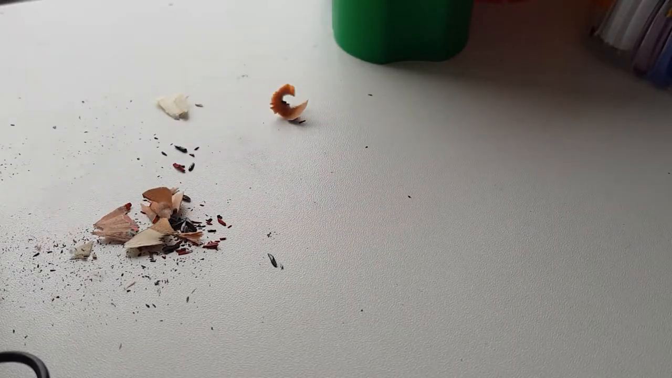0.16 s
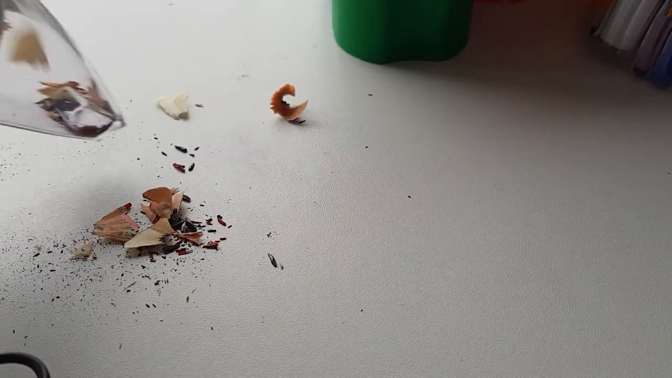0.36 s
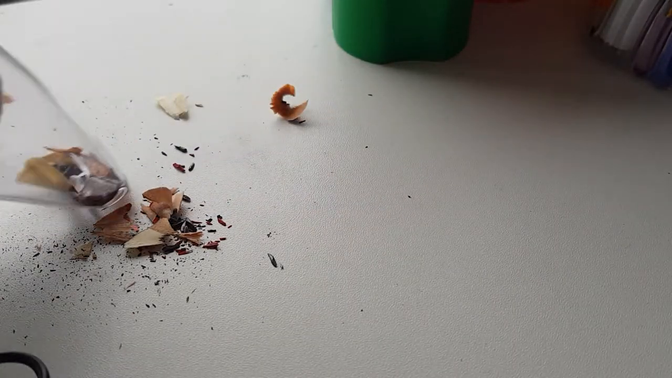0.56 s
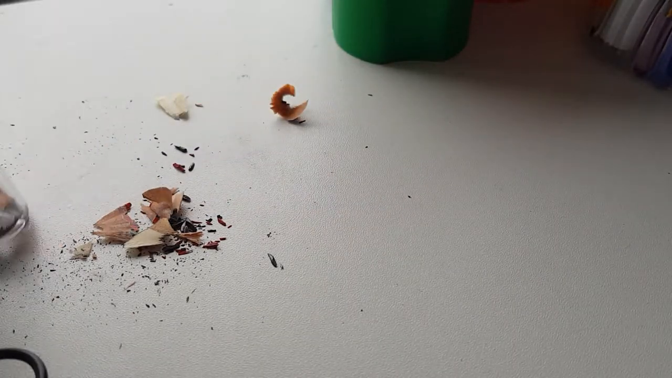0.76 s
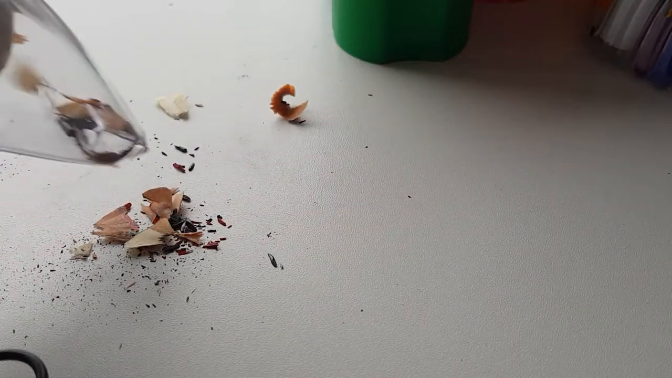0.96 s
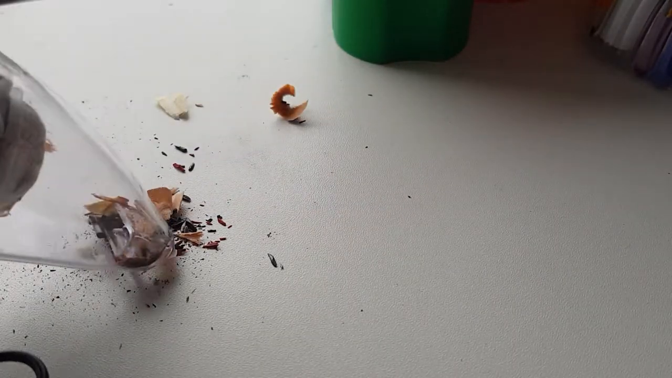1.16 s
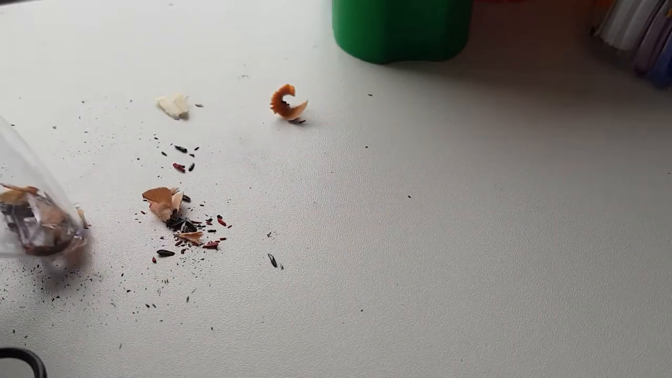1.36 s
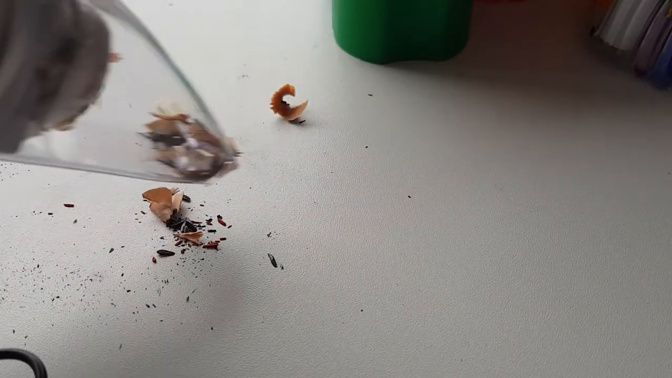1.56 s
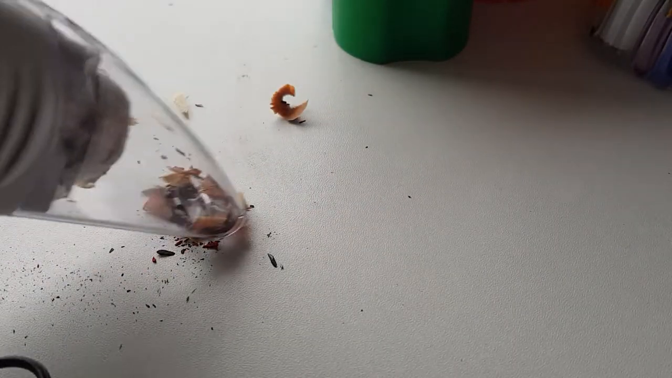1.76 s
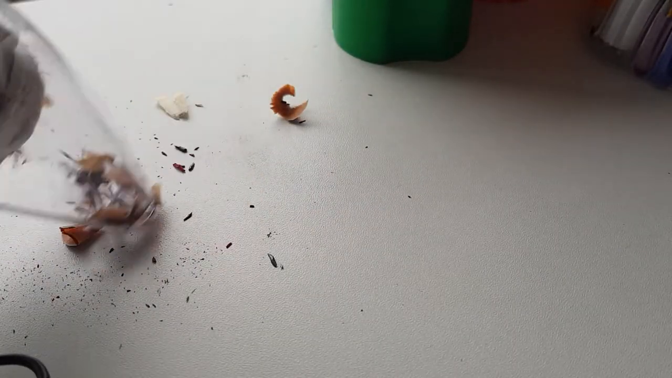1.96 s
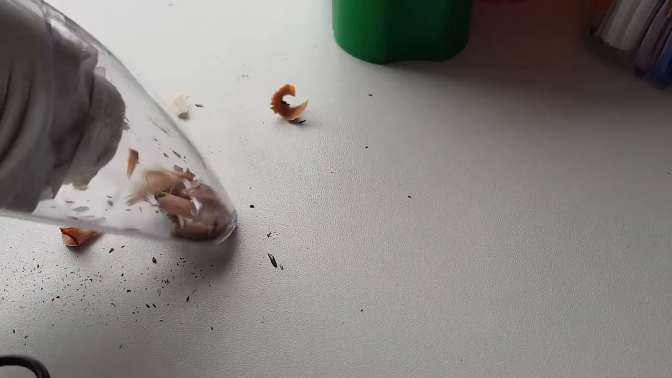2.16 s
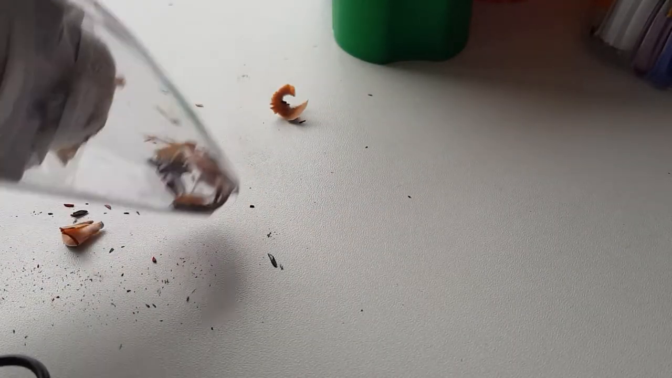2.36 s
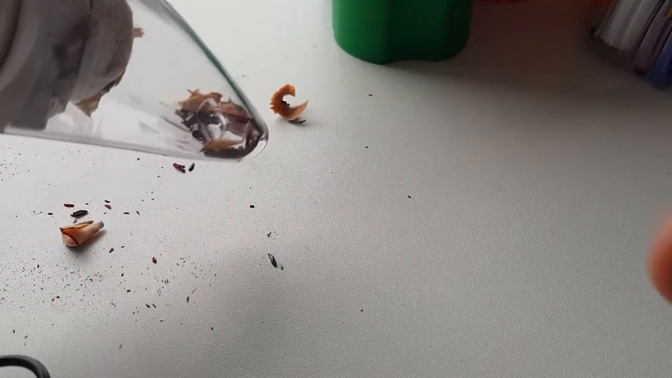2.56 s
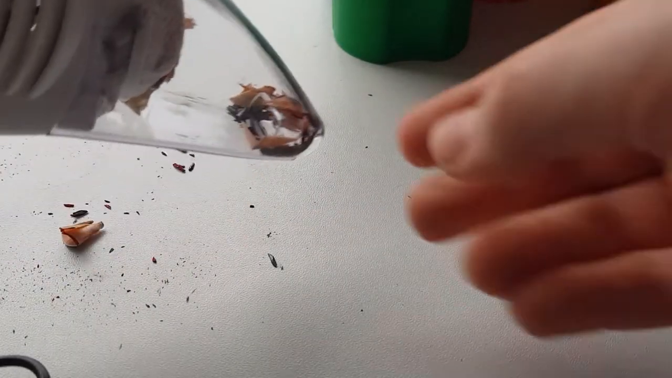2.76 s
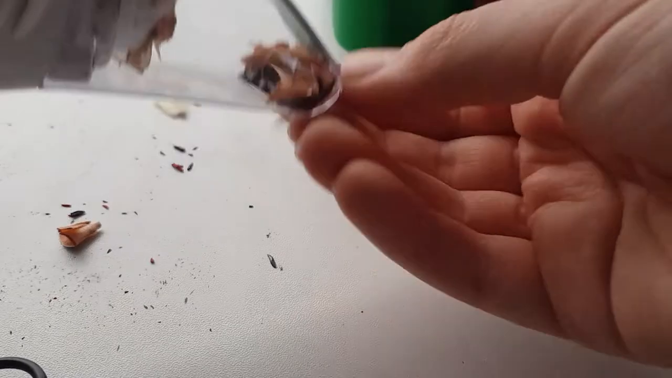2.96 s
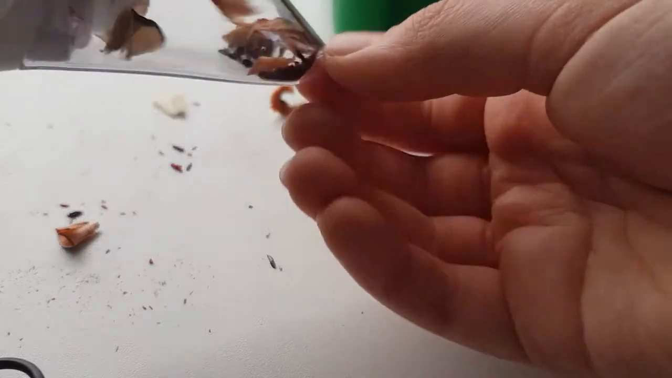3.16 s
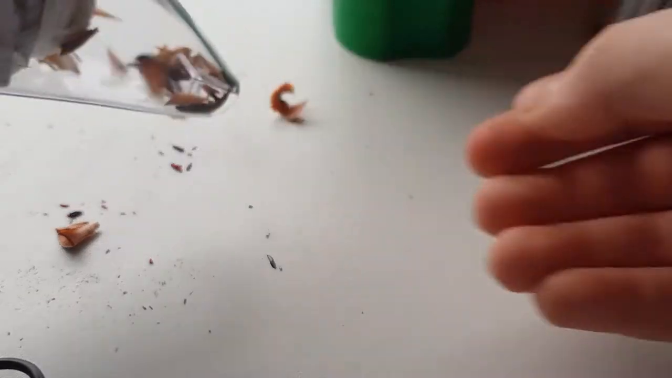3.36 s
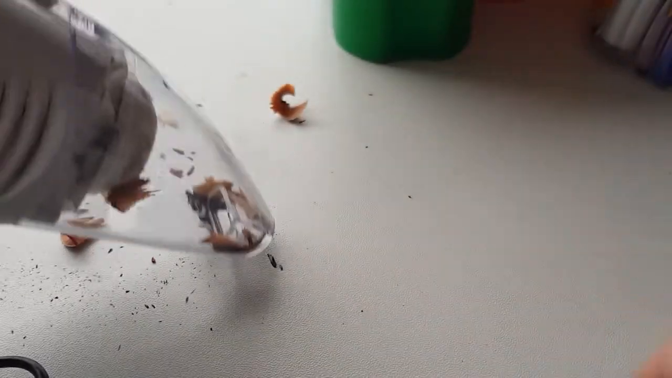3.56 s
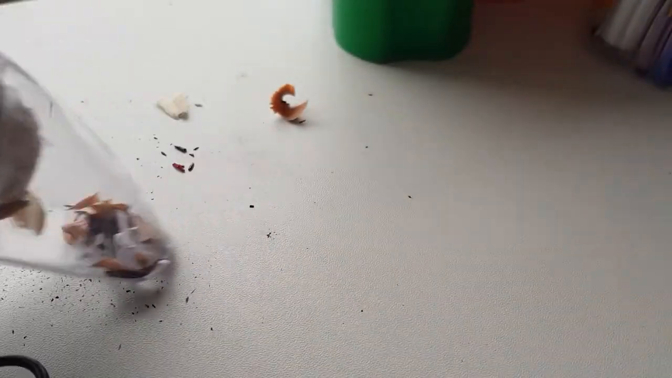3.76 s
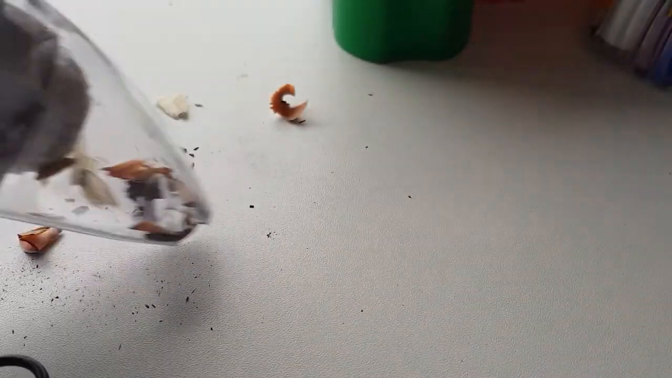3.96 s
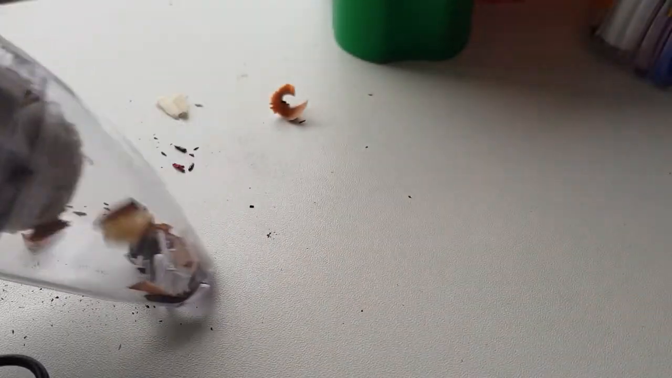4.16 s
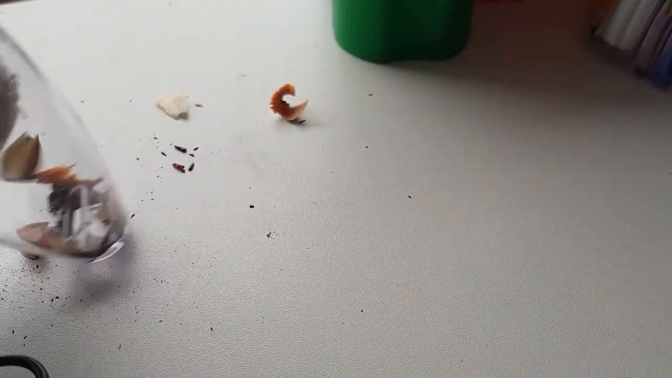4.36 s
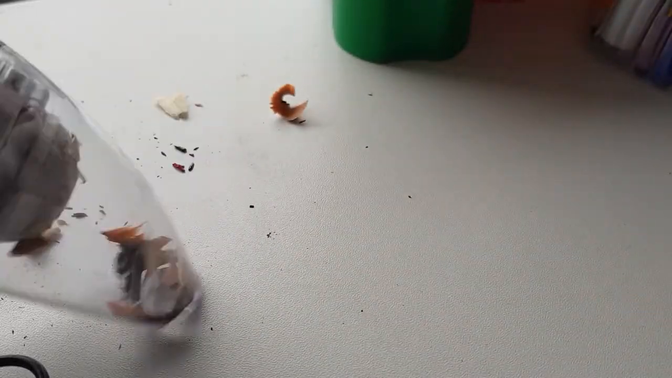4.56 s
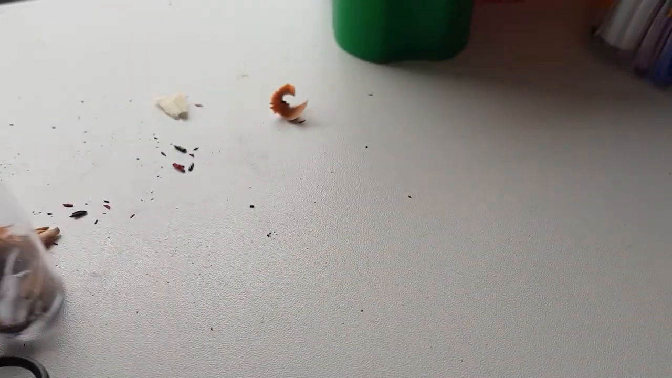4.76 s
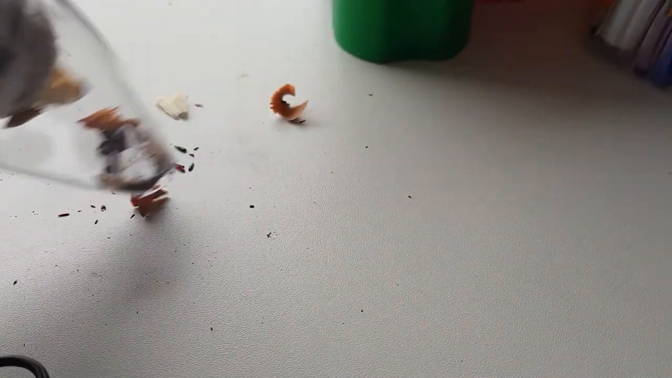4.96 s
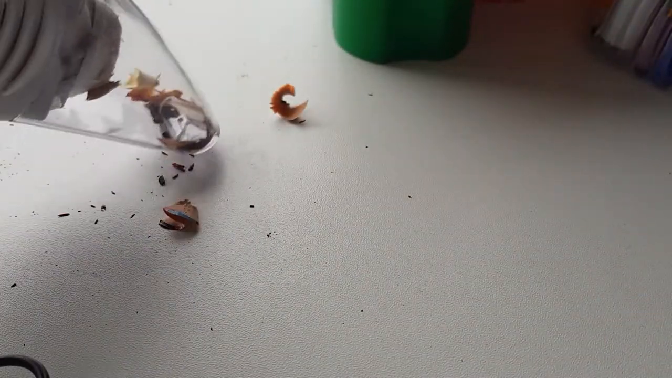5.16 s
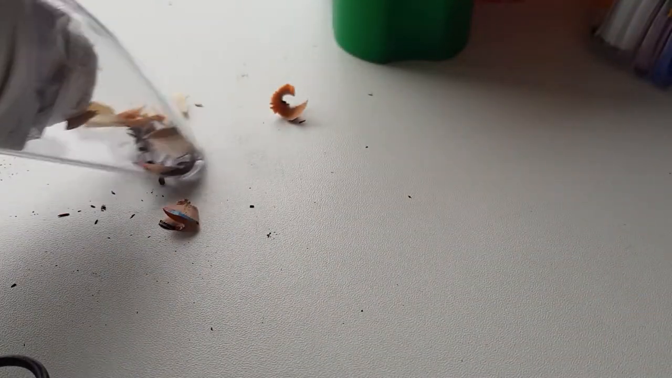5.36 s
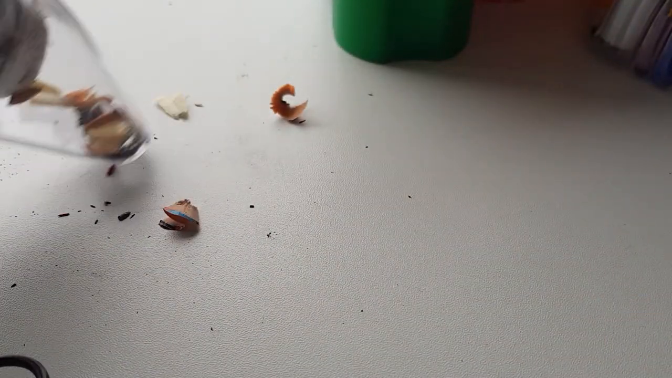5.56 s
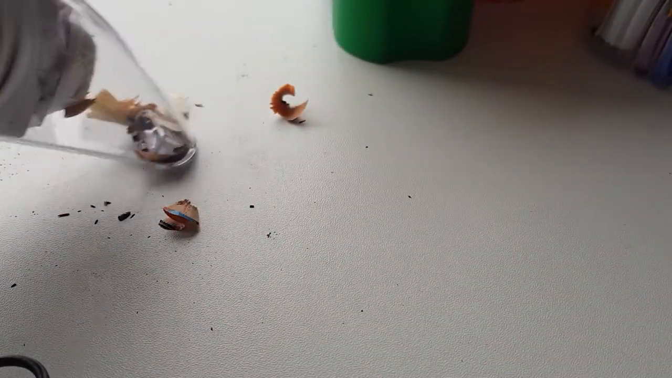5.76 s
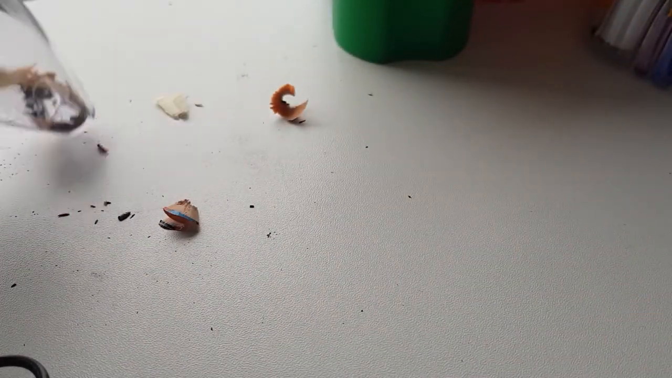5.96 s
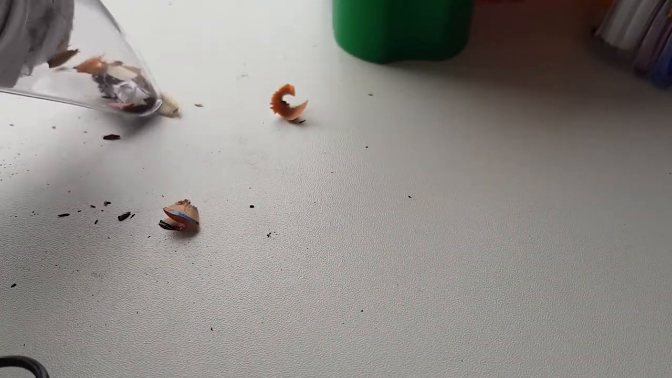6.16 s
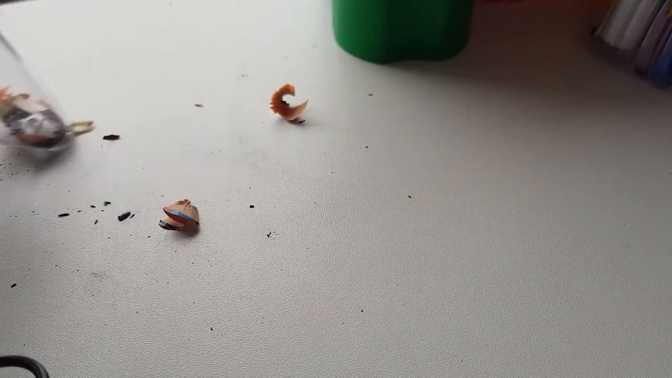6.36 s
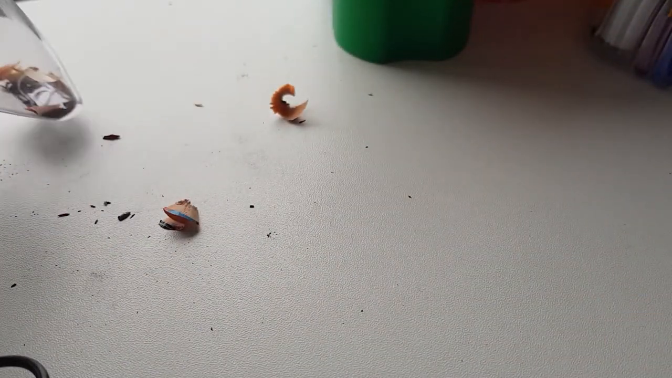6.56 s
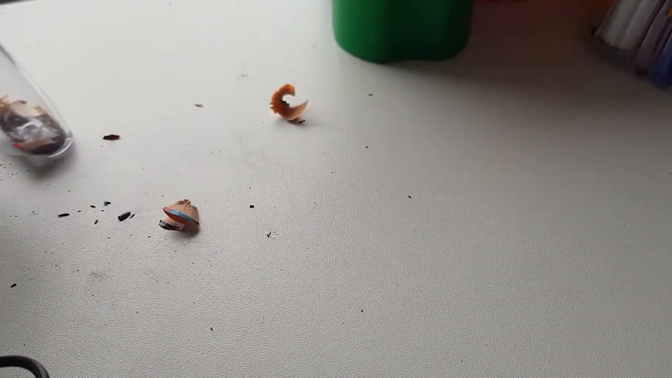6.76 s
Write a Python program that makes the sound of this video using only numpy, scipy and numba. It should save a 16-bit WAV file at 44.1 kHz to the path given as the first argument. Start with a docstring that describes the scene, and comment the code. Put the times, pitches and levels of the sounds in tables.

```python
"""At a desk in a small furnished room, a tiny handheld vacuum runs close by, a little left of a phone's
stereo microphones. Its motor sings a comb of shaft orders and air rushes through the nozzle. Again and
again the plastic tip knocks on the desk and is dragged back, buzzing once a turn and stuttering over the
surface; both ring the desk top and the nozzle shell, with a faint, dull room tail behind them."""
import sys
import numpy as np
from scipy import signal
from scipy.fft import rfft, irfft, next_fast_len
from scipy.io import wavfile
from scipy.ndimage import uniform_filter1d
from numba import njit

SR = 44100
rng = np.random.default_rng(int(sys.argv[2]) if len(sys.argv) > 2 else 0)


def output_pcm(signal):
    """Save a mono or channel-first signal as 16-bit PCM at the path in sys.argv[1].

    Samples are clipped to [-1, 1] before scaling.
    """
    pcm = np.clip(np.atleast_2d(signal).T, -1, 1) * 32767
    wavfile.write(sys.argv[1], SR, np.round(pcm).astype(np.int16))


N = 301203
TIME = np.arange(N) / SR
HALF = np.array([[.5], [-.5]])  # splits a left-minus-right value between the microphones

# motor shaft speed: t/s, f/Hz
SHAFT_SPEED = [(0.0, 229.6), (0.21, 230.3), (1.22, 230.8), (1.5, 232.8), (2.11, 233.3), (2.43, 231.0),
               (2.89, 231.0), (3.25, 232.2), (3.73, 230.8), (4.09, 231.0), (4.17, 230.0), (4.53, 230.5),
               (4.75, 229.6), (4.91, 230.9), (5.32, 230.3), (6.31, 230.7), (6.43, 231.5), (6.83, 230.5)]
# motor as the hand turns it: t/s, unbalance hum/dB, six-blade tone/dB, order 41/dB, whine/dB
MOTOR_LEVELS = [(0, -40.5, -44.5, -47, -39), (.9, -41, -41, -43, -39), (1.4, -39, -42, -49.5, -38),
                (1.7, -39.5, -42, -45, -37), (2.1, -39.5, -43, -43.5, -37.5), (2.5, -42, -42, -45, -39.5),
                (3.1, -40.5, -44, -46, -38.5), (3.7, -41.5, -42, -42, -40), (4.5, -41.5, -42.5, -47, -39),
                (5.2, -42, -43.5, -47, -41), (6.2, -42.5, -44.5, -49, -41), (6.5, -42, -46.5, -43, -41),
                (6.83, -41, -45, -49, -41.5)]
# order 24 swells and fades with the strokes: t/s, level/dB
ORDER_24_LEVEL = [(.1, -50), (.39, -57.5), (.75, -46), (1.06, -58.5), (1.4, -46.5), (1.6, -58), (1.82, -66),
                  (1.95, -49.5), (2.15, -65), (2.7, -57), (3.38, -65), (3.9, -49.5), (4.1, -65),
                  (4.35, -50), (4.55, -62), (4.7, -49), (5.15, -57.5), (5.5, -54), (6.5, -48.5),
                  (6.83, -49.5)]
# four firm tones: shaft order, left minus right/dB, left lead/rad
FIRM_TONES = [(1, 1, .6), (6, 2, 1.), (24, 4, -.9), (41, 9, -.3)]
# comb, relative to the whine level: shaft order, left/dB, right/dB
WHINE_ORDERS = [(2, -23, -21), (3, -19, -18), (4, -11, -15), (5, -16, -19), (7, -19, -18), (8, -25, -21),
                (9, -20, -15), (10, -26, -26), (11, -19, -24), (12, -18, -14), (13, -25, -27),
                (14, -28, -29), (15, -19, -23), (16, -26, -27), (17, -26, -29), (18, -20, -15),
                (19, -22, -25), (20, -21, -16), (21, -21, -23), (22, -20, -23), (23, -24, -27),
                (25, -21, -21), (26, -22, -21), (27, -16, -19), (28, -17, -18), (29, -20, -18),
                (30, -18, -18), (31, -24, -27), (32, -26, -27), (33, -25, -26), (34, -25, -28),
                (35, -15, -26), (36, -11, -17), (37, -20, -24), (38, -17, -22), (39, -16, -23),
                (40, -19, -22), (42, -21, -22), (43, -16, -19), (44, -12, -19), (45, -12, -15),
                (46, -15, -21), (47, -6, -10), (48, -14, -18), (49, -15, -25), (50, -15, -24),
                (51, -14, -18), (52, -16, -19), (53, -10, -13), (54, -7, -12), (55, -13, -18),
                (56, -6, -16), (57, -12, -22), (58, -10, -20), (59, -16, -32), (60, -10, -24),
                (61, -13, -33), (62, -9, -26), (63, -16, -41), (64, -11, -41), (65, -18, -41),
                (66, -6, -40), (67, -5, -40), (68, -8, -38)]
# spectrum of the air rush: f/Hz, relative density/dB
AIR_SPECTRUM = [(30, -20), (120, -15), (300, -9), (420, -11), (720, -8), (1050, 1), (1250, -4), (1750, -12),
                (3200, -12.5), (3800, -17), (6300, -16), (7500, -22), (8500, -17), (15800, -18)]
# where the rush sits: f/Hz, left minus right/dB
AIR_PAN = [(60, -3), (300, 0), (700, -2), (1050, 5), (1500, -2), (2500, 2), (5000, 0), (10000, 3),
           (15000, 5)]
# how alike the rush is at the two microphones: f/Hz, coherence/0-1
AIR_COHERENCE = [(60, .6), (300, .9), (1200, .8), (2500, .35), (6000, .1)]
# tip dragged along: t/s, length/s, level/dB, change by the end/dB, shell at start/dB, shell at end/dB,
# low desk modes/dB (these three relative to the level), buzzing share/0-1, hum damping/dB
TIP_DRAGS = [(0, .18, -25.5, -13.5, -14, -37, -1.5, 0.06, 8),
             (0.584, 0.18, -27, -5.5, -37, -38, 0.5, 0.04, 5),
             (1.203, 0.09, -47.5, 6, -20, -22, 1.5, 0, -1),
             (1.767, 0.17, -41, -1.5, -21, -23, 7, 0.57, 0.5), (2.221, 0.085, -27, -6, -22, -18, 1, 0, 1),
             (3.664, 0.2, -25.5, -5.5, -40, -21, -1, 0.05, 2), (4.128, 0.19, -27, -2, -33, -24, 1, 0, 1),
             (4.642, 0.2, -29, -4.5, -30, -13, 1.5, 0.06, 4),
             (5.309, 0.19, -28.5, -2.5, -32, -25, -0.5, 0.2, 5),
             (5.758, 0.13, -28, -5.5, -35, -32, 4, 0.01, 3),
             (6.201, .075, -23, -3.5, -33, -35, -3.5, .1, 2), (6.294, 0.07, -34, 2, -38, -38, -2, 0.2, 12),
             (6.366, 0.061, -30, -6, -40, -23, 4.5, 0.06, -2),
             (6.689, 0.17, -31.5, 0, -42, -28, 2.5, 0.07, -0.5)]
# modes of the desk top: f/Hz, t60/s, level/dB
DESK_MODES = [(116.3, 0.084, -9), (184, 0.064, -10), (311.5, 0.088, -3.5), (350.4, 0.043, 4.5),
              (451, 0.03, 5), (550, 0.084, -17), (676, 0.1, 1), (752, 0.044, 1.5), (849, 0.062, -4),
              (1020, 0.17, -15.5), (1308, 0.096, -12.5)]
# modes of the nozzle shell: f/Hz, t60/s, level/dB
SHELL_MODES = [(1512, 0.018, 0), (1980, 0.017, 4.5), (2260, 0.016, 0), (2599, 0.045, 3.5),
               (3207, 0.023, -6), (4050, .04, -4), (4900, .02, -23), (6400, 0.048, -6)]
# how nearby modes reach the microphones: f/Hz, left minus right/dB, left lead/rad
MODE_PAN = [(150, -2, -.1), (290, -1, .2), (400, 0, -.2), (560, 3, 1.2), (660, 6, 2.6), (820, 7, 1.4),
            (1060, 0, -1.4), (1300, 1, -.5), (1600, 2, .5), (2150, 0, 1.6), (3150, 0, -.5), (3900, 1, 1.3),
            (6250, 2, .4)]
# tip meets the desk: t/s, thump/dB, tip/dB, shell/dB, crack/dB, share kept by each repeated thump/0-1
TIP_KNOCKS = [(0.5526, -27, -17, -18.5, -27, 1), (1.1769, -22, -30, -30, -33, 0.35),
              (1.7367, -12.5, -24, -24, -30, 0.52), (2.195, -22, -10, -6, -14, 0.7),
              (3.6476, -18.5, -16.5, -19, -30, 0.7), (4.1113, -22, -11, -10, -18.5, 0.43),
              (4.6094, -26, -9.5, -8, -16.5, .8), (5.304, -23.5, -14.5, -15.5, -24.5, 0.85),
              (5.7414, -19.5, -13, -14.5, -19.5, 0.62), (6.1925, -18.5, -17, -21.5, -24.5, 0.54),
              (6.6616, -25.5, -21, -24.5, -31, 0.75)]


def undb(db):
    """Decibels to gain."""
    return 10 ** (np.asarray(db) / 20)


def unit(x):
    """Scale to rms 1."""
    return x / np.sqrt(np.mean(x ** 2))


def curves(rows):
    """Columns of a table, joined in time."""
    times, *columns = np.transpose(rows)
    return [np.interp(TIME, times, column) for column in columns]


def over(hz, table):
    """A table read on a log-frequency axis."""
    table_hz, values = np.transpose(table)
    return np.interp(np.log(hz), np.log(table_hz), values)


def walk(rate_hz, count=1, step=1):
    """Rows of smooth random drift, one value every step samples; spread near 1."""
    hold = max(int(SR / step / rate_hz), 2)
    n = N // step + 2
    held = np.repeat(rng.standard_normal((count, n // hold + 1)), hold, axis=1)
    return 1.455 * uniform_filter1d(uniform_filter1d(held, hold), hold)[:, :n]


def contact(start, length, land_s=.0086, lift_s=.019):
    """Pressure of a dragged tip as it lands, holds and lifts, and its progress along the stroke; both 0-1."""
    landing = 1 + (TIME - start) / land_s
    lifting = 1 + (start + length - TIME) / lift_s
    return np.clip(np.minimum(landing, lifting), 0, 1), np.clip((TIME - start) / length, 0, 1)


def shaft_tone(angle, db, order, pan_db, lead):
    """One firm shaft order; db is its level midway between the microphones."""
    mics = undb(HALF * pan_db) * np.exp(1j * HALF * lead)
    return np.sqrt(2) * undb(db) * np.real(mics / abs(mics.mean()) * np.exp(1j * order * angle))


@njit
def comb(angle, gains, step):
    """Sum of shaft harmonics, gliding between complex gains[frame, microphone, order - 1]."""
    out = np.zeros((2, len(angle)))
    for i in range(len(angle)):
        frame, blend = i // step, (i % step) / step
        turn, harmonic = np.exp(1j * angle[i]), 1 + 0j
        for k in range(gains.shape[2]):
            harmonic *= turn
            for mic in range(2):
                gain = (1 - blend) * gains[frame, mic, k] + blend * gains[frame + 1, mic, k]
                out[mic, i] += (harmonic * gain).real
    return out


def whine(angle, wander_hz=10., flicker_hz=22., flicker_db=.7, step=512):
    """Shaft orders that each swell, fade and turn in phase as the hand moves the body over the desk."""
    order, *mics_db = np.transpose(WHINE_ORDERS)
    wander = walk(wander_hz, 4 * len(order), step).reshape(2, 2, len(order), -1)
    depth = 1.1 * np.clip(order / 30, .3, 1)[:, None]  # short waves feel the movement most
    drift = (1 + depth * (wander[0] + 1j * wander[1])) / np.sqrt(1 + 2 * depth ** 2)
    start_phase = np.exp(2j * np.pi * rng.random((2, len(order), 1)))
    partials = np.sqrt(2) * undb(mics_db)[:, :, None] * start_phase * drift
    gains = np.zeros((wander.shape[-1], 2, int(order.max() + .5)), complex)
    gains[:, :, np.rint(order).astype(int) - 1] = np.moveaxis(partials, 2, 0)
    # the whole comb flickers a little as the load on the fan changes
    gains *= undb(flicker_db * walk(flicker_hz, step=step)[0])[:, None, None]
    return comb(angle, gains, step)


def motor(angle, waver_db=2.2, waver_hz=7.):
    """Four firm tones over the whine; on most strokes the tip pressed on the desk damps the hum."""
    hum_db, blade_db, order_41_db, whine_db = curves(MOTOR_LEVELS)
    hum_db -= sum(damping_db * contact(start, length)[0] for start, length, *_, damping_db in TIP_DRAGS)
    order_41_db += waver_db * walk(waver_hz)[0, :N]
    tones_db = hum_db, blade_db, curves(ORDER_24_LEVEL)[0], order_41_db
    tones = sum(shaft_tone(angle, db, *row) for db, row in zip(tones_db, FIRM_TONES))
    return tones + undb(whine_db) * whine(angle)


def air_rush(bands=17, slow_hz=3.5, fast_hz=14., depth_db=1.2):
    """Turbulence in the nozzle, in half-octave bands that each flicker alone; rms 1."""
    n = next_fast_len(N)
    hz = np.arange(1, n // 2 + 2) * SR / n
    mid, side = rfft(rng.standard_normal((2, n)))
    coherence = np.clip(over(hz, AIR_COHERENCE), 0, 1)
    spectrum = np.sqrt(1 + coherence) * mid + 2 * HALF * np.sqrt(1 - coherence) * side
    spectrum *= undb(over(hz, AIR_SPECTRUM) + HALF * over(hz, AIR_PAN))
    band_position = np.clip(2 * np.log2(hz / 60), 0, bands - 1)
    flicker = undb(depth_db * (walk(slow_hz, bands) + walk(fast_hz, bands)))
    rush = 0
    for band in range(bands):
        window = np.clip(1 - abs(band_position - band), 0, 1)
        rush += flicker[band, :N] * irfft(spectrum * window, n)[:, :N]
    return unit(rush)


def push(ms):
    """Half-sine contact force of unit impulse."""
    samples = max(ms * SR / 1000, 1.5)
    shape = np.sin(np.pi * np.arange(.5, samples) / samples)
    return shape / shape.sum()


def ring(force, modes):
    """A force rings damped modes; each reaches the two microphones with its own level and phase."""
    out = 0
    for hz, t60, db in modes:
        pole = np.exp(2j * np.pi * hz / SR - np.log(1000) / (t60 * SR))
        _, pan_db, lead = min(MODE_PAN, key=lambda row: abs(row[0] - hz))
        mics = undb(db + HALF * pan_db) * np.exp(1j * HALF * lead)
        out -= np.real(mics * signal.lfilter([1], [1, -pole], force))
    return out


def drag_force(angle, buzz_share, catches_per_s=2200, catch_scatter_db=2., tap_scatter_db=2.5):
    """The shaking tip taps the desk once a turn and catches on it at random moments."""
    caught = rng.random(N) < catches_per_s / SR
    size = undb(catch_scatter_db * rng.exponential(size=N))
    catches = unit(caught * size * np.sign(rng.standard_normal(N) + .5))
    new_turn = np.diff(angle // (2 * np.pi), prepend=0) > 0
    taps = unit(new_turn * undb(tap_scatter_db * rng.standard_normal(N)))
    impulses = np.sqrt(buzz_share) * taps + np.sqrt(1 - buzz_share) * catches
    return np.convolve(impulses, push(ms=.35))[:N]


def drags(angle, low_modes_hz=400, spot_scatter_db=2.5, spot_change_hz=12.):
    """Stroke by stroke, the sliding tip rings the desk top and the nozzle shell."""
    level, low_level, shell_level, buzz_share = np.zeros((4, N))
    for start, length, db, change_db, shell_db, shell_end_db, low_db, share, _ in TIP_DRAGS:
        pressure, along = contact(start, length)
        gain = pressure * undb(db + change_db * along)
        level += gain
        low_level += gain * undb(low_db)
        shell_level += gain * undb(shell_db + (shell_end_db - shell_db) * along)
        buzz_share[pressure > 0] = np.clip(share, 0, 1)
    force = drag_force(angle, buzz_share)
    desk_rms, shell_rms = [np.sqrt(np.mean(ring(force, modes).mean(axis=0) ** 2))
                           for modes in (DESK_MODES, SHELL_MODES)]
    # each spot of the desk top answers with its own mix of modes
    spot = undb(spot_scatter_db * walk(spot_change_hz, len(DESK_MODES))[:, :N])
    spot /= np.sqrt(np.mean(spot ** 2, axis=0))
    desk = 0
    for mode, weight in zip(DESK_MODES, spot):
        drive = low_level if mode[0] < low_modes_hz else level
        desk += ring(drive * force * weight, [mode])
    # a sliding tip hardly flexes the whole top, so the bass is thin
    desk = signal.lfilter(*signal.butter(3, 200, "high", fs=SR), desk)
    return desk / desk_rms + ring(shell_level * force, SHELL_MODES) / shell_rms


def knocks(hard_db=-10, tip_to_desk_db=-5, tick_after_s=.0065, tick_db=-13.5, crack_decay_s=.005):
    """The hard tip clicks and cracks; the weight behind it thumps the desk softly, four times over."""
    tip, shell, thump, crack = np.zeros((4, N + SR))
    crack_fade = np.exp(-np.arange(SR // 20) / SR / crack_decay_s)
    soft = push(ms=1.75)
    for start, thump_db, tip_db, shell_db, crack_db, share in TIP_KNOCKS:
        i = int(start * SR)
        softer_db = max(hard_db - tip_db, 0)
        sharp = push(ms=.38 + .006 * softer_db)  # a softer blow touches longer
        tip[i:i + len(sharp)] += undb(tip_db) * sharp
        shell[i:i + len(sharp)] += undb(shell_db) * sharp
        # the tip rebounds and ticks the shell once more, short and hard
        shell[i + int(tick_after_s * SR)] += undb(shell_db + tick_db)
        crack[i:i + len(crack_fade)] += undb(crack_db) * crack_fade
        # the repeats follow a hard blow as rebounds; on soft blows they come ahead of the click
        gap_ms = 2.885 - .54 * softer_db
        for k in range(4):
            at = i + k * int(gap_ms * SR / 1000)
            thump[at:at + len(soft)] += np.clip(share, 0, 1) ** k * undb(thump_db) * soft
    crack_band = signal.butter(1, [3000, 9000], "band", fs=SR, output="sos")
    hiss = signal.sosfilt(crack_band, rng.standard_normal((2, N)))
    desk = ring(thump[:N] + undb(tip_to_desk_db) * tip[:N], DESK_MODES)
    return desk + ring(shell[:N], SHELL_MODES) + crack[:N] * hiss


def room(x, t60_s=.49, delay_s=.006):
    """A small furnished room returns a dull, decaying tail, unrelated at the two microphones."""
    t = np.arange(SR // 2) / SR
    dull_noise = signal.lfilter([1], [1, -.7], rng.standard_normal((2, len(t))))
    tail = dull_noise * 1000. ** (-t / t60_s) * (t > delay_s)
    return signal.fftconvolve(x, tail / np.sqrt(np.sum(tail ** 2) / 2), axes=1)[:, :N]


def scene(jitter_hz=.12, air_db=-41, room_db=-23):
    """Motor, air and the tip on the desk, heard from close by; one shaft times both whine and buzz."""
    shaft_hz = curves(SHAFT_SPEED)[0] + jitter_hz * walk(rate_hz=18.)[0, :N]
    angle = 2 * np.pi * np.cumsum(shaft_hz) / SR
    desk = knocks() + drags(angle)
    # the desk top is small: it radiates little deep bass
    desk = signal.sosfilt(signal.butter(4, 150, "high", fs=SR, output="sos"), desk)
    return motor(angle) + undb(air_db) * air_rush() + desk + undb(room_db) * room(desk)


def record(dry, right_top_hz=14300, top_hz=15850):
    """The top treble is cut, lower on the right microphone; a soft limiter rounds the loudest knocks."""
    right = signal.sosfilt(signal.butter(8, right_top_hz, fs=SR, output="sos"), dry[1])
    rounded = np.tanh([dry[0], right])
    return signal.sosfilt(signal.ellip(10, .2, 70, top_hz, fs=SR, output="sos"), rounded)


dry = scene()
out = record(dry)
output_pcm(out)
```